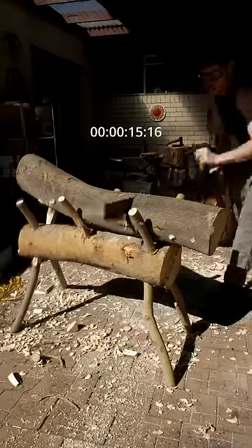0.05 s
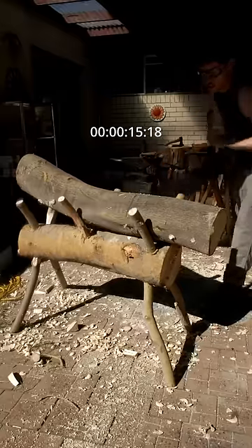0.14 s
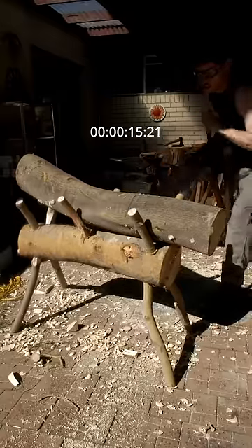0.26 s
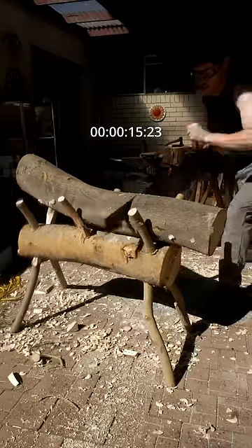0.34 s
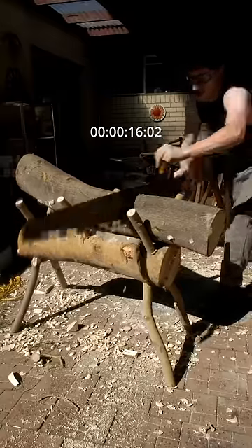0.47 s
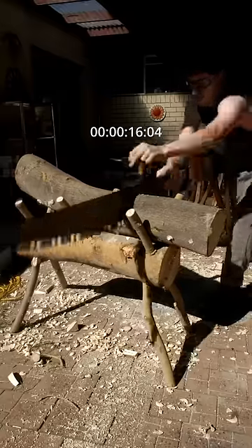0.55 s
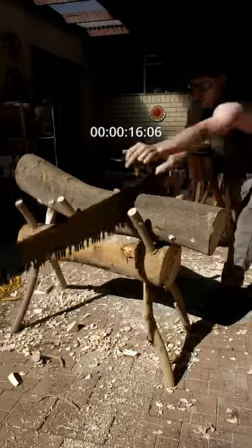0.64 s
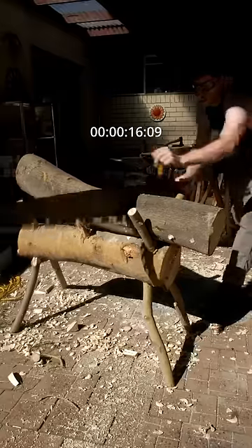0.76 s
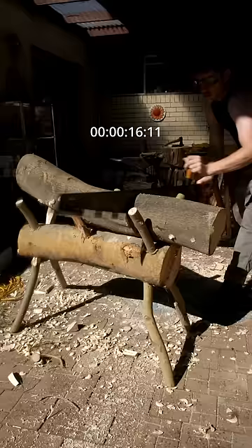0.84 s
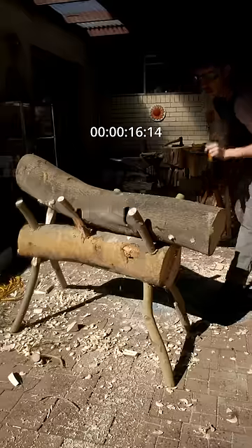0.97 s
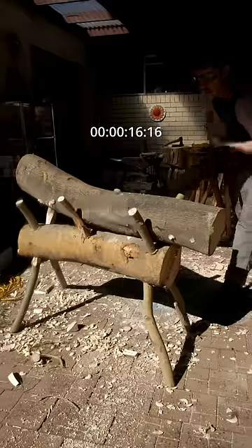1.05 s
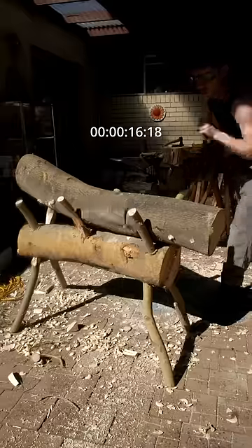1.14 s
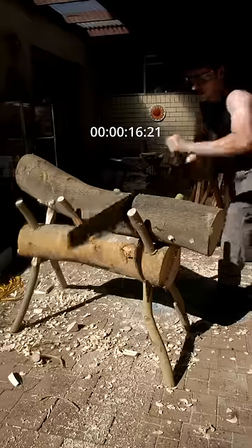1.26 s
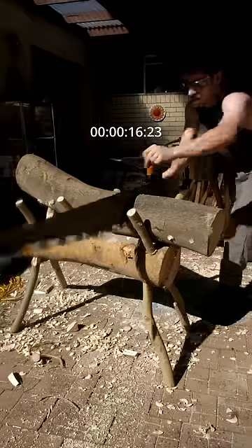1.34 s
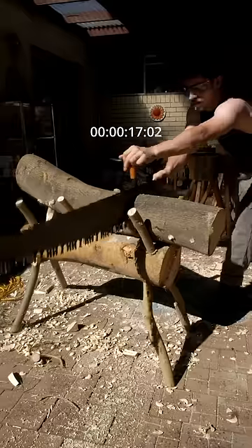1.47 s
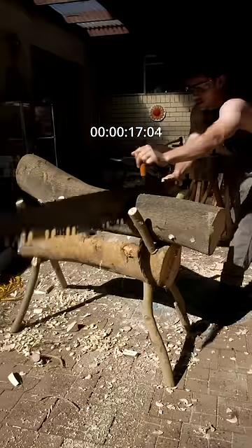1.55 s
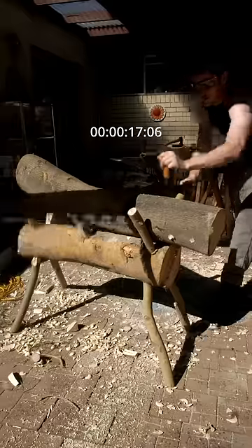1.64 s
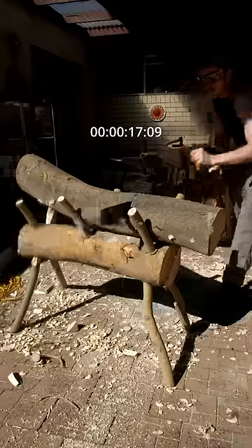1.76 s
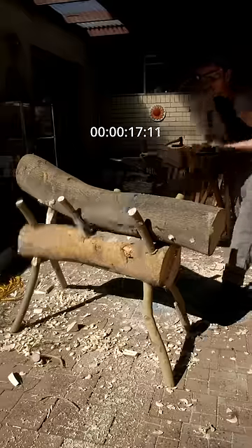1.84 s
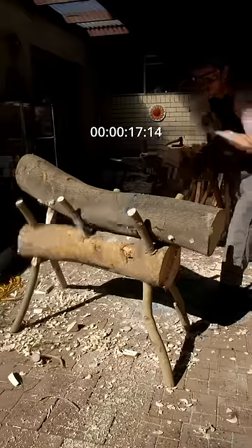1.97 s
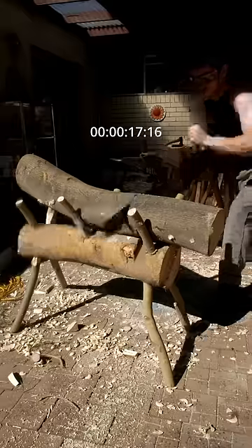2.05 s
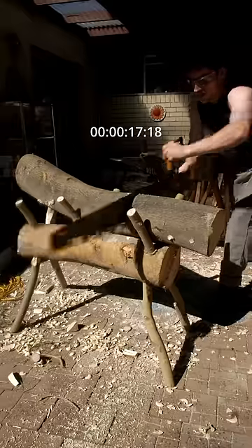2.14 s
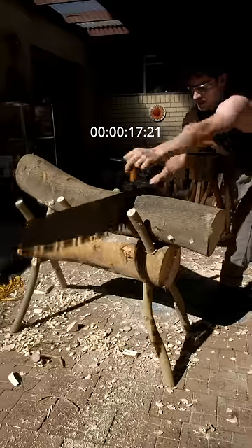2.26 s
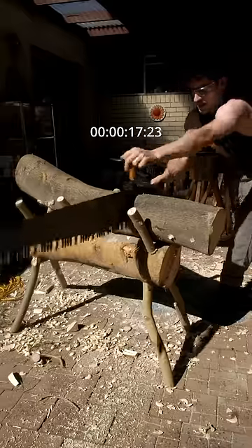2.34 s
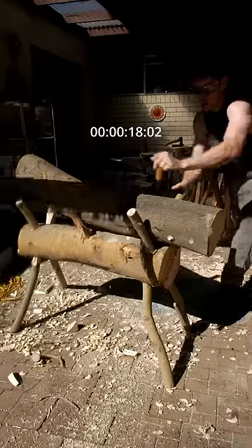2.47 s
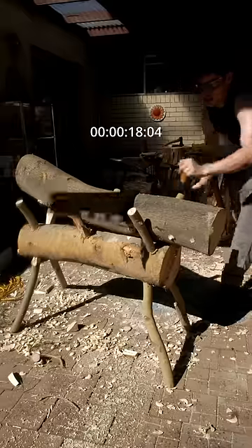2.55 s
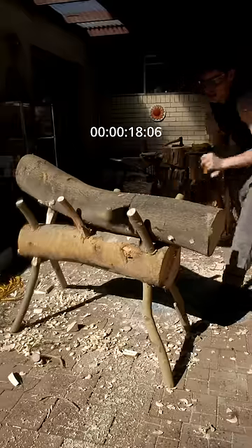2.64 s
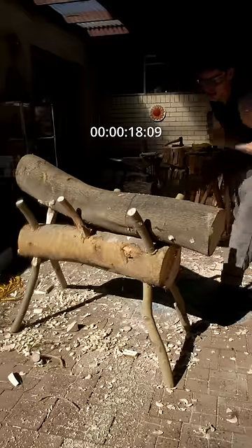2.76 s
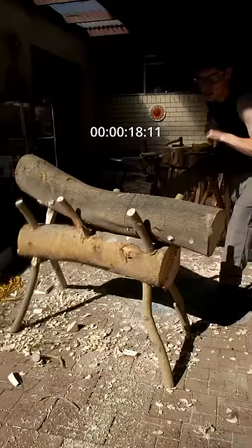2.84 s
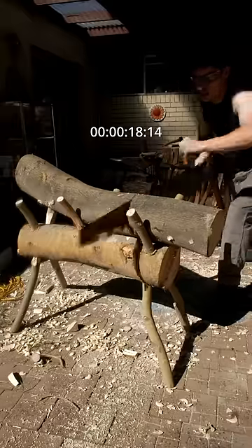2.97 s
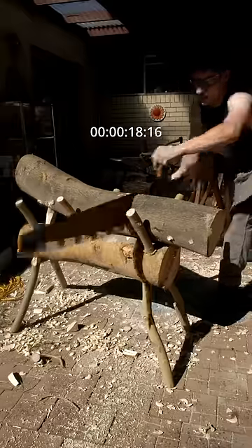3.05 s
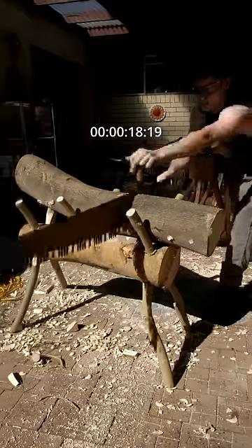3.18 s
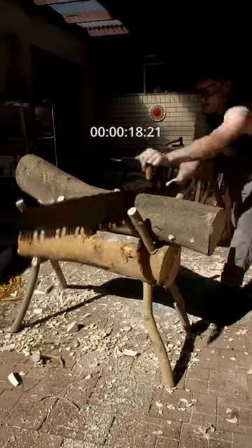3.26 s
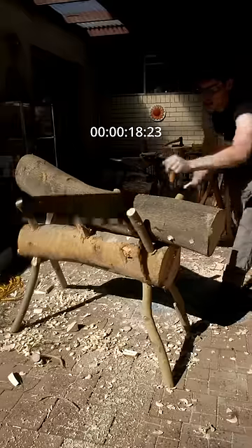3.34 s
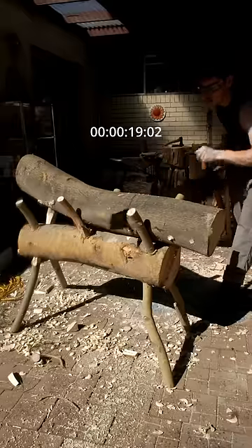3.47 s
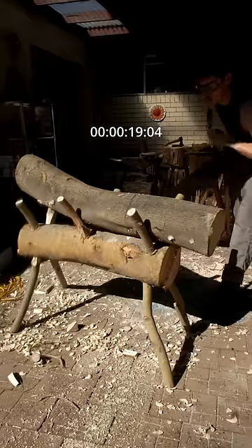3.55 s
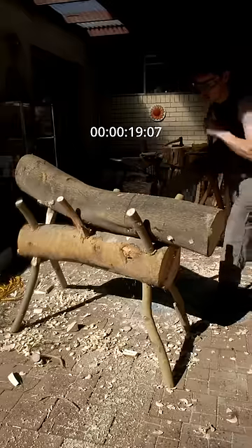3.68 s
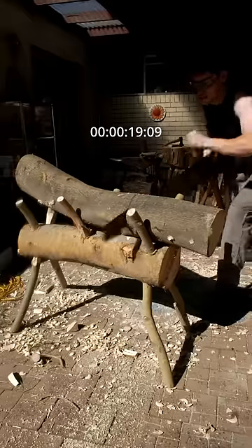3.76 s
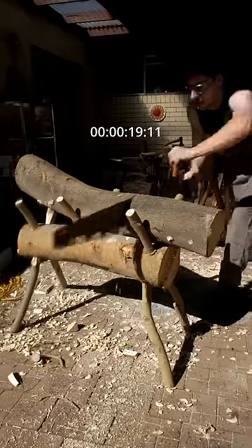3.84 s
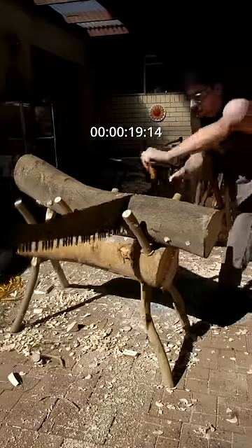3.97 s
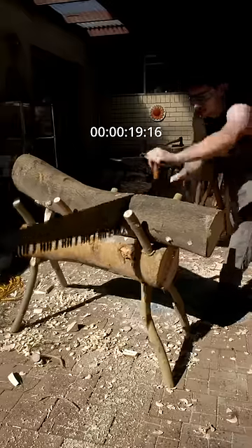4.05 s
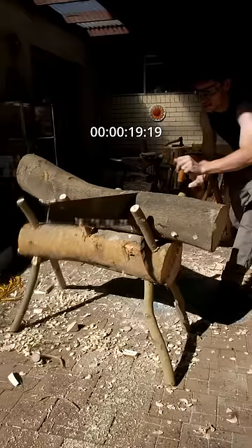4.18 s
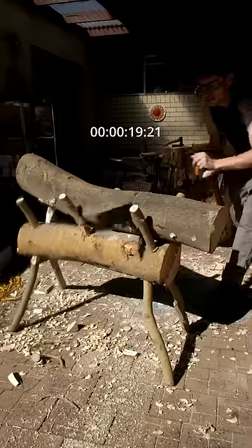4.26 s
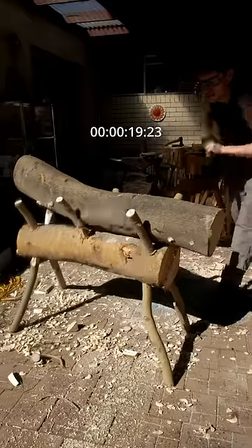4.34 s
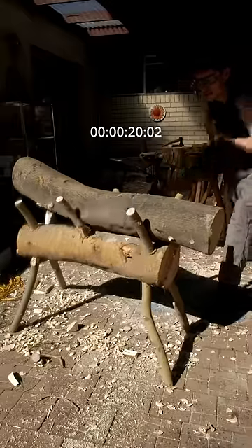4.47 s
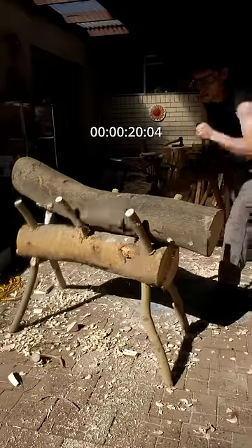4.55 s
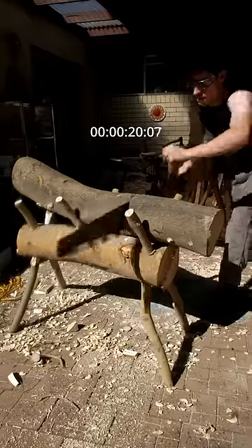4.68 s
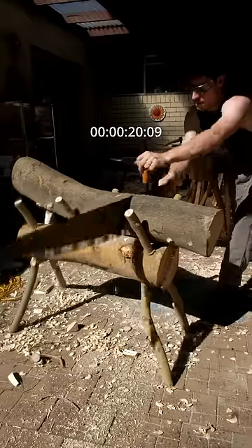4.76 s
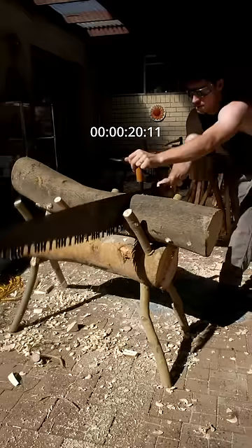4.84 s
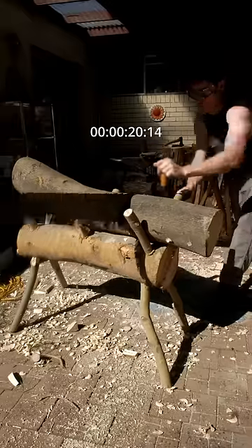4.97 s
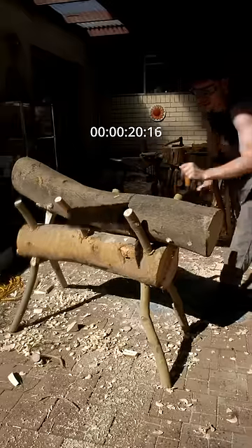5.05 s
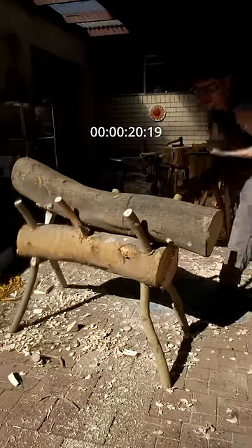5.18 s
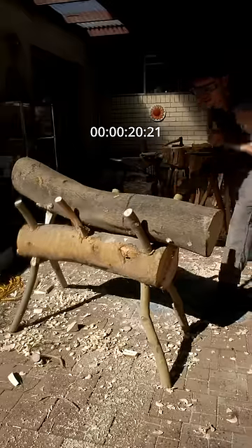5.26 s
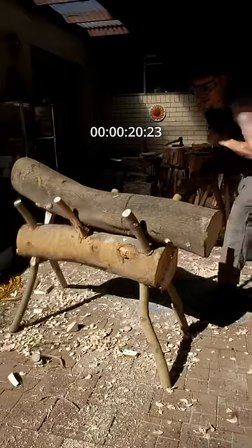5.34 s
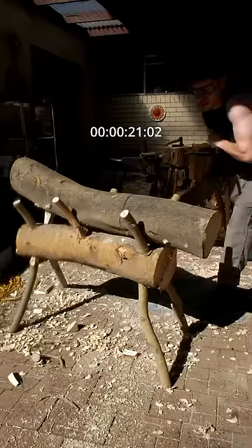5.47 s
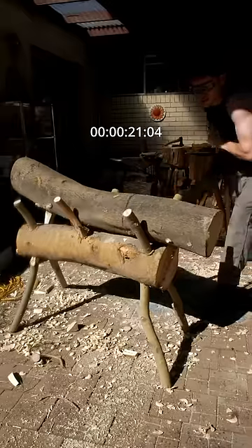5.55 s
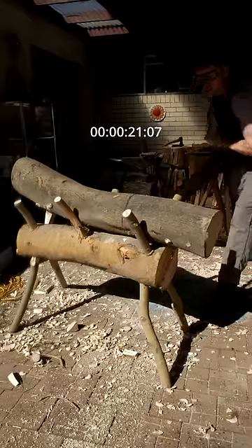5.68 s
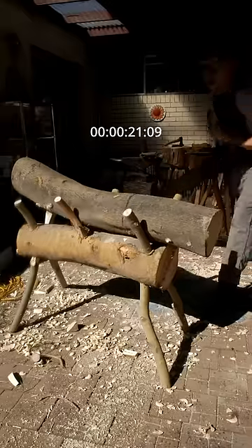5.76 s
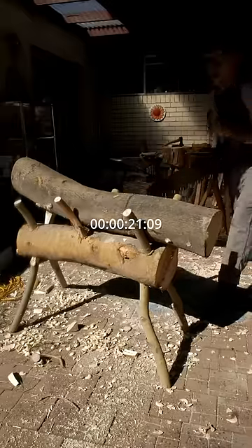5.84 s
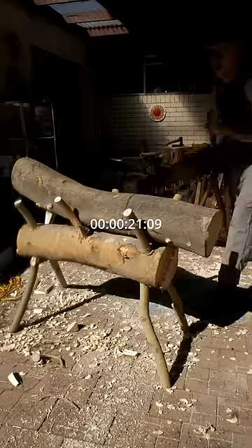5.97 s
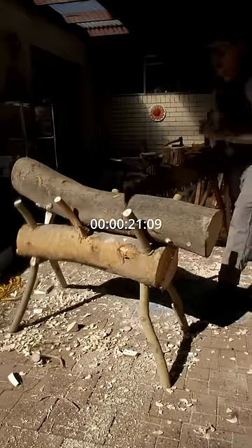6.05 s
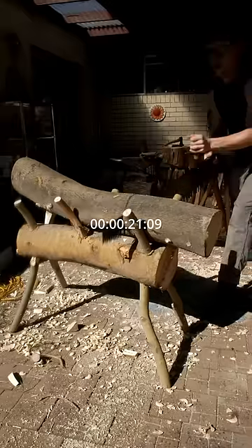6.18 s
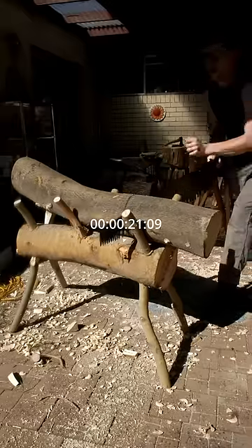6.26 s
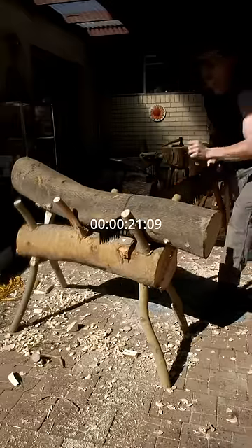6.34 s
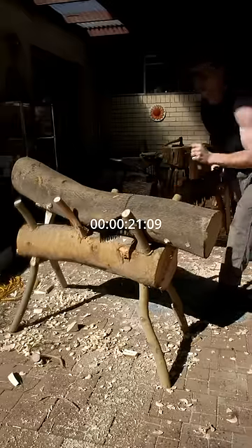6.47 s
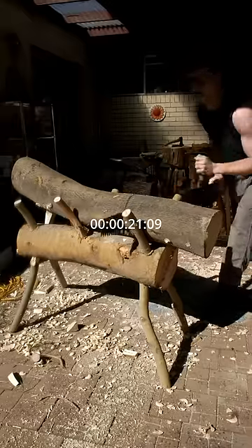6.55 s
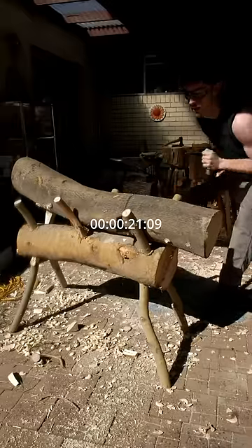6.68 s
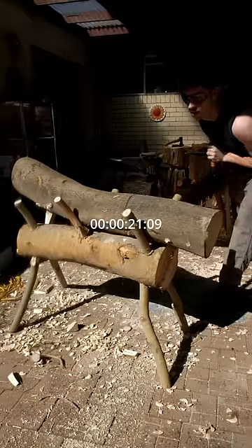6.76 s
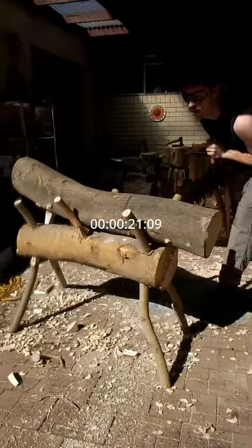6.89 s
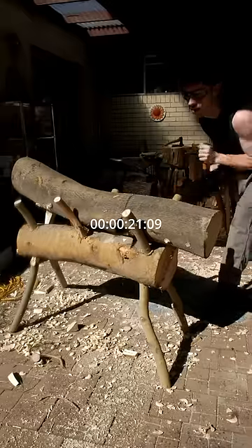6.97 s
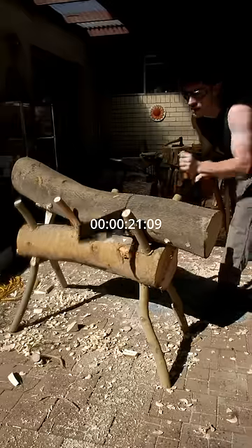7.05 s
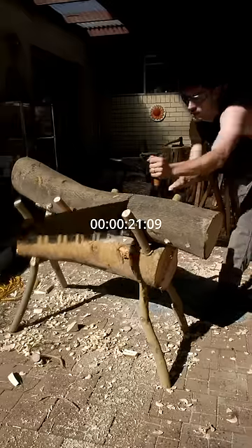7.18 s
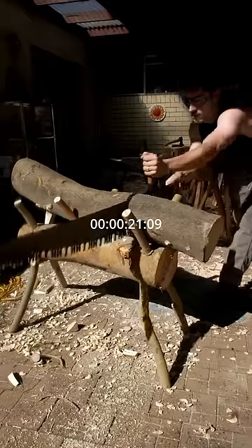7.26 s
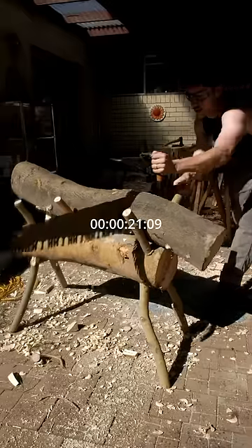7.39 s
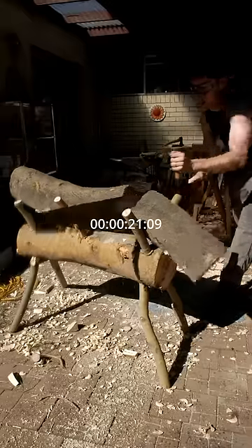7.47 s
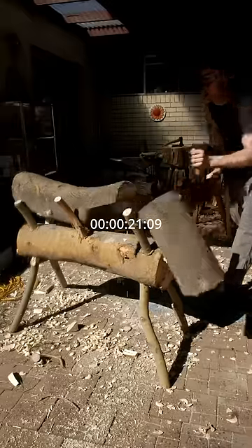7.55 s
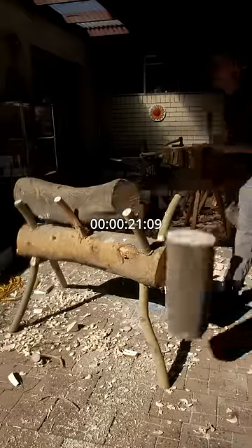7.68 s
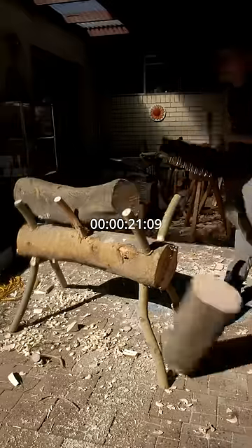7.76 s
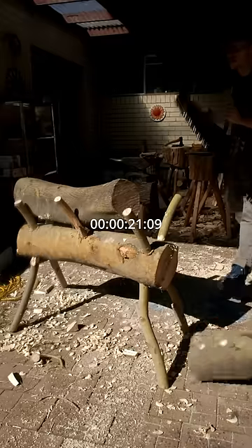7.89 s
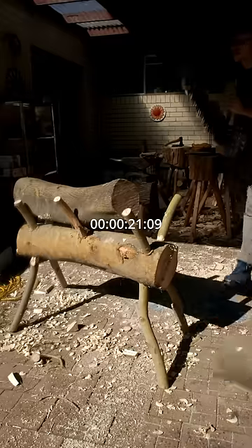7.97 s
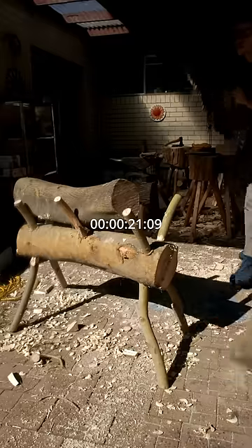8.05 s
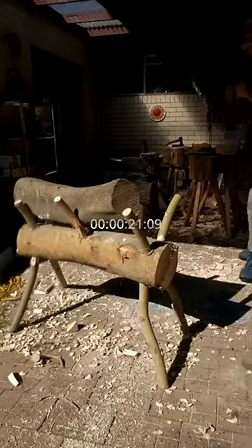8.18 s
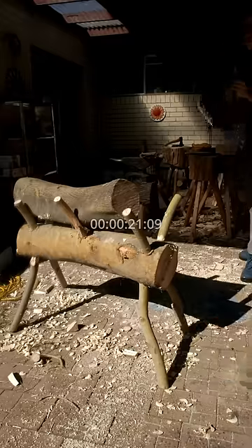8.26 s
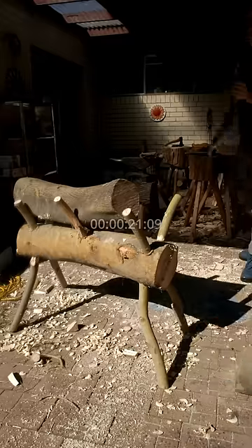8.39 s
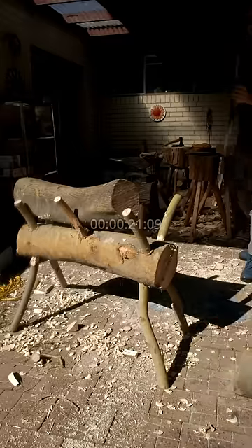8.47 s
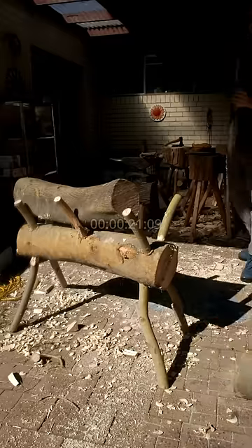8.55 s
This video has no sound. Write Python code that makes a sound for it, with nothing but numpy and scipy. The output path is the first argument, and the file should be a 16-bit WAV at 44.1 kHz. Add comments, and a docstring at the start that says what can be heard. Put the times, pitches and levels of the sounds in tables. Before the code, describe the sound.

A long, dull handsaw tears through a log in rough, regular strokes, more than two a second, with uneven bites, catches and wooden knocks. It pauses amid small ticks, takes a few spaced last strokes, and the piece cracks off, bumping and rolling on paving. Close microphone in an open shed with a short dull echo, low wind buffeting and faint far traffic.

```python
"""A long, dull handsaw works through a log on a sawhorse in an open shed: noise shaped as tearing fibres,
with uneven bites, catches and wavering tones of the pinched blade.
The saw pauses, takes a few last strokes, and the cut piece cracks off, drops and bounces on paving,
heard as ringing wood modes, ticks and sliding grit.
Close by, wind buffets the microphone with low noise; far traffic is a steady, duller noise bed."""
import sys
import numpy as np
from scipy import signal
from scipy.fft import rfft, irfft, next_fast_len
from scipy.io import wavfile
from scipy.ndimage import uniform_filter1d

SR = 44100
rng = np.random.default_rng(int(sys.argv[2]) if len(sys.argv) > 2 else 0)


def master(y):
    """Save y as 16-bit WAV."""
    cut = np.clip(np.atleast_2d(y).T, -1, 1)
    pcm = np.round(cut * 32767)  # scale
    wavfile.write(sys.argv[1], SR, pcm.astype(np.int16))


N = 380120
T = np.arange(N) / SR  # time [s]

# Saw strokes. Each row: full speed reached in s, time held in s, rasp level in dB then, rasp level in dB
# when slowing, rise in dB per s, fall in dB per s, and where growl, log body and fine hiss level off, in dB;
# all levels before the random bites.
STROKES = [(-0.05, 0.15, -19.5, -21.5, 250, 162, -26, -32.5, -28),
           (0.394, 0.13, -20, -18.5, 274, 174, -29.5, -37, -32),
           (0.821, 0.15, -20.5, -26.5, 269, 184, -31, -34, -22.5),
           (1.237, 0.15, -23.5, -18.5, 262.5, 208, -28.5, -36.5, -21),
           (1.671, 0.13, -18.5, -19, 199, 166, -26.5, -35.5, -25),
           (2.102, 0.13, -22.5, -16.5, 273.5, 193, -26.5, -36.5, -26),
           (2.44, .03, -39.5, -38, 400, 200, -36, -54, -42),
           (2.537, 0.13, -15.5, -18.5, 303, 179, -27, -36, -26),
           (2.971, 0.16, -23.5, -19.5, 193, 221, -23, -40, -24),
           (3.373, 0.12, -19, -19, 286, 181, -28.5, -36.5, -30.5),
           (3.808, 0.12, -21.5, -24, 224, 213, -29.5, -37.5, -12),
           (4.243, 0.12, -22, -24, 218, 186, -25.5, -36, -32),
           (4.651, 0.14, -23, -23, 195, 185, -25.5, -40, -16),
           (4.935, 0.026, -39, -37, 292, 202.5, -33, -41.5, -36),
           (5.014, 0.14, -20.5, -22, 602, 149, -7, -39.5, -24),
           (5.7, 0.048, -57, -56, 600, 119, -57, -63, -65),
           (6.095, 0.14, -41.5, -34, 300, 220, -19, -35, -51),
           (6.65, 0.12, -60, -50.5, 152, 133, -48, -45, -49),
           (7.029, .19, -26, -25, 344, 194, -29.5, -40.5, -8),
           (7.384, 0.12, -35, -27.5, 478, 179, -30, -36.5, -20)]
# Teeth that catch hard. Each row: time in s, drive level in dB.
CATCHES = [(0.395, -32), (0.4414, -42), (0.7721, -30), (0.814, -25), (1.2456, -28), (1.6676, -22),
           (2.489, -31), (2.5341, -25), (2.617, -20), (2.972, -20), (3.331, -21), (3.3677, -19.5),
           (3.445, -16), (3.7638, -29), (3.8057, -31), (4.2148, -29), (4.246, -25), (5.011, -18.5),
           (6.091, -45), (6.123, -31), (6.2282, -29), (6.9825, -33), (7.045, -38), (7.456, -22)]
# The pinched blade sings. Each row: start in s, length in s, first pitch in Hz, middle level in dB.
SINGING = [(4.687, .03, 703, -39.5), (4.79, .07, 686, -40), (4.968, 0.048, 693, -51),
           (5.06, 0.11, 674, -36.5), (5.198, 0.088, 658, -48), (6.79, 0.04, 660, -50),
           (6.98, .025, 670, -46), (7.118, 0.052, 657, -39), (7.228, .04, 640, -42),
           (7.482, 0.081, 882, -35.5)]
# The freed blade sounds on. Each row: pitch in Hz, middle level in dB.
FREED_BLADE = [(3900, -64)]
# When it does so: first row the start in s, last row the end in s.
FREED_SPAN = [(8.03,), (8.29,)]
# Bark and chips sliding on paving. Each row: start in s, length in s, middle level in dB at start and at end.
SLIDES = [(7.655, 0.11, -38.5, -65), (7.921, 0.02, -35, -30.5), (7.934, 0.071, -29.5, -40.5),
          (8.04, 0.198, -56.5, -50), (8.266, 0.047, -55, -47), (8.345, 0.27, -57, -68)]
# The fallen piece tumbles after a bounce. Each row: time in s, drive level in dB.
TUMBLES = [(7.85, -33), (8.029, -23.5), (8.32, -27)]
# Knocks of wood. Each row: time in s, drive levels in dB of crack, ring and thud, splinter tail in dB
# relative to the crack, rattle in dB relative to the ring.
KNOCKS = [(0.128, -23, -27, -48, -20, -9), (0.9682, -13, -39, -53, -19, -7),
          (0.9798, -13, -24.5, -55, -14, -3), (0.9989, -12.5, -27, -56.5, -17.5, -4.5),
          (2.318, -40, -31, -50, -20, -16), (3.5177, -8, -20, -54, -21, -5.5),
          (3.529, -9.5, -42, -51, -28, -20), (4.1684, -24, -23.5, -34, -22, -9),
          (4.336, -8.5, -25.5, -46, -12.5, 0.5), (4.355, -10, -18, -62, -10, -7.5),
          (7.642, -11.5, -23, -53, -29, -9.5), (7.7983, -19, -33, -34, -18.5, -9),
          (7.85, -20, -26.5, -19.5, -43, -17), (8.0181, -14.5, -16, -6.5, -33, -12),
          (8.314, -21, -9, -12.5, -15, -10.5)]
# Small ticks of chips and twigs. Each row: time in s, drive level in dB, pitch in Hz.
TICKS = [(5.386, -30, 3740), (5.5034, -42, 1930), (5.609, -40, 2740), (5.684, -39, 1960),
         (5.702, -29, 1870), (5.76, -40, 3220), (6.0591, -40, 5640), (6.1444, -16, 5030),
         (6.2428, -12, 3530), (6.71, -32, 3290), (6.7486, -24, 5500), (6.809, -30, 3830), (8.24, -40, 3900),
         (8.2678, -32, 4040), (8.286, -33, 1830), (8.46, -35, 2600), (8.5214, -37, 2860),
         (8.561, -27, 1800)]
# Wind on the microphone. Each row: time in s, middle rumble level in dB, flutter in dB relative to rumble.
WIND = [(0.0, -25, -18), (0.04, -38, -17), (0.38, -32, -16), (0.91, -39.5, -13), (1.01, -29.5, -33),
        (1.3, -37, -11), (1.39, -28.5, -16), (1.63, -40.5, -17), (1.65, -30, -27), (1.78, -35.5, -9.5),
        (1.97, -16, -20.5), (2.13, -36, -11), (2.23, -17.5, -14.5), (2.35, -29, -16), (2.42, -13, -31),
        (2.5, -28, -20), (2.64, -11.5, -11.5), (2.9, -24, -6.5), (3.38, -19, -22.5), (3.45, -23.5, -10),
        (3.84, -16, -18.5), (3.91, -26.5, -15), (4.08, -24.5, -23), (4.32, -29, -14.5), (5.09, -32, -14.5),
        (5.47, -30, -10), (5.52, -25.5, -4.5), (5.76, -39.5, -14), (6.12, -33, -13.5), (6.39, -47.5, -3.5),
        (7.06, -30, -18.5), (7.32, -50, 3.5), (7.61, -34.5, -18), (7.78, -50.5, 2), (7.9, -34.5, -1),
        (8.62, -45.5, -6)]
# Tone of the torn fibres, split at 2800 Hz into growl and rasp. Each row: frequency in Hz, relative dB per Hz.
RASP_TONE = [(710, -34), (1200, -10.5), (1610, -14), (1910, -4), (2540, -5.5), (3750, 1), (4320, -4.5),
             (5200, 0), (6420, -7), (9000, -18), (11700, -33), (19800, -120)]
# Tone of the fine hiss. Each row: frequency in Hz, relative dB per Hz.
HISS_TONE = [(4710, -40), (8000, -2), (9040, -1), (10200, -1.5), (11300, -1), (11800, 0), (13900, -4),
             (15800, -10.5)]
# Tone of the shaken log. Each row: frequency in Hz, relative dB per Hz.
BODY_TONE = [(160, -48), (280, -53), (354, -2.5), (536, -1), (736, -3), (895, 4.5), (1200, -5), (1700, -2),
             (2210, -31), (3740, -120)]
# Modes of the saw blade. Each row: frequency in Hz, width in Hz, middle gain in dB.
BLADE_MODES = [(2280, 87, -19), (3540, 120, -13), (4700, 2200, -14.5), (6870, 230, -7.5), (10880, 230, -5)]
# Modes of the wood, the first for the thud. Each row: frequency in Hz, relative level in dB (unused for the
# thud), time to fall 60 dB in s.
LOG_MODES = [(185, 0, 0.026), (419.5, -2, 0.11), (526, 2.5, 0.048), (780, 7.5, 0.071), (855, 4.5, 0.17),
             (1140, -42, .15), (1455, 1, 0.083), (1920, 3, 0.02)]
# Tone of the far traffic. Each row: frequency in Hz, relative dB per Hz.
TRAFFIC_TONE = [(90, -21), (180, -3), (260, -5.5), (480, -10.5), (880, -4), (1100, -11), (1600, -18),
                (4000, -27), (8000, -35.5), (15500, -43)]

GROWL_DB, BODY_DB, HISS_DB = -44.5, -44.5, -49.5  # levels while the saw is slow and the rasp is at -40 dB
HISS_STEEPNESS = 1.21  # dB of hiss per dB of rasp: it starts and stops more abruptly
STICK_S, STICK_DB = 0.018, -4.5  # the blade hangs for a moment before a catch breaks loose
SAG_HZ_PER_S, SING_FADE_S = 100, .035
UPPER_DB = -4.5  # modes of the wood above 1300 Hz
FAINT_TICKS_PER_S, FAINT_TICK_DB = 6, -45.5  # drive level before random sizes
TUMBLE_T60_S = 0.34
TRAFFIC_DB = -47.5  # middle level
CLIP = 0.65  # ceiling of the soft clipping, full scale = 1
TOP_HZ = 15800


def undb(db):
    """Amplitude of a level in dB."""
    return 10 ** (np.asarray(db) / 20)


def unit(x):
    """Scale to rms 1."""
    return x / np.sqrt(np.mean(x ** 2))


def noise():
    """White noise over the whole scene."""
    return rng.standard_normal(N)


def curves(table):
    """Columns of a table joined by straight lines in time."""
    s, *columns = np.transpose(table)
    return [np.interp(T, s, c) for c in columns]


def inside(start, end, fade_s=.015):
    """1 from start to end, fading to 0 outside."""
    return np.clip(np.minimum(T - start, end - T) / fade_s + 1, 0, 1)


def colour(x, points):
    """Shape a noise by (Hz, dB) points joined over log frequency; rms 1."""
    size = next_fast_len(N)
    hz = np.maximum(np.arange(size // 2 + 1) * SR / size, 1)
    f, db = np.transpose(points)
    gain = undb(np.interp(np.log(hz), np.log(f), db))
    return unit(irfft(rfft(x, size) * gain, size)[:N])


def humps(x, shapes):
    """Parts of a sound under bell curves (Hz, width Hz), without phase shift, so that they add back cleanly."""
    size = next_fast_len(N)
    hz, spectrum = np.arange(size // 2 + 1) * SR / size, rfft(x, size)
    return [irfft(spectrum * np.exp(-.5 * ((hz - f) / width) ** 2), size)[:N] for f, width in shapes]


def band(x, lo_hz, hi_hz):
    """Butterworth band-pass."""
    return signal.sosfilt(signal.butter(2, [lo_hz, min(hi_hz, .45 * SR)], "band", fs=SR, output="sos"), x)


def ring(x, hz, t60):
    """One decaying mode, struck by x."""
    pole = np.exp(2j * np.pi * hz / SR - np.log(1000) / (t60 * SR))
    return signal.lfilter([1], [1, -pole], x).imag


def fade(x, t60):
    """Every spike starts an exponential decay."""
    return signal.lfilter([1], [1, -np.exp(-np.log(1000) / (t60 * SR))], x)


def spikes(times, db):
    """Single-sample blows."""
    out = np.zeros(N)
    np.add.at(out, (np.asarray(times) * SR).astype(int), undb(db))
    return out


def walk(rate):
    """Random levels held 1 / rate s and smoothed twice; rms 1."""
    k = int(SR / rate)
    steps = np.repeat(rng.standard_normal(N // k + 1), k)
    return unit(uniform_filter1d(uniform_filter1d(steps, k), k)[:N])


def grains(rate, spread_db, most_db):
    """Snaps at random moments, rate per s, a few larger than the rest."""
    when, size, sign = rng.random((3, N))
    size_db = np.minimum(-spread_db * np.log(size + 1e-9), most_db)
    return (when < rate / SR) * undb(size_db) * (sign - .5)


def even(x, span_s, share):
    """Flatten part of a noise's own swells."""
    power = uniform_filter1d(x ** 2, int(span_s * SR))
    return unit(x / (power + .02) ** (share / 2))


def holds(*columns):
    """Level in dB of events that rise, hold on a slope and fall; the loudest one counts. Also its index."""
    start, length, first_db, last_db, rise, fall = (np.reshape(c, (-1, 1)) for c in columns)
    since = T[::32] - start
    db = first_db + (last_db - first_db) * np.clip(since / length, 0, 1)
    db = db + rise * np.minimum(since, 0) - fall * np.maximum(since - length, 0)
    return np.interp(T, T[::32], db.max(axis=0)), np.repeat(db.argmax(axis=0), 32)[:N]


def shaken_blade():
    """Tearing fibres drive the blade; its free length changes, so modes come and go and its colour wanders."""
    fibres = unit(grains(9000, 2.3, 7.5)) + 1.03 * noise()
    shake = fibres.copy()
    modes = humps(fibres, [(hz, width / 2) for hz, width, _ in BLADE_MODES])
    for mode, (_, _, db) in zip(modes, BLADE_MODES):
        shake += undb(db + 5.0 * walk(13)) * mode
    centres = 1500 * 2 ** np.arange(0, 3.4, 1 / 3)  # a third of an octave apart
    for patch in humps(fibres, [(hz, hz / 9) for hz in centres]):
        shake += 0.15 * walk(30) * patch
    # thin overtones of the steel flash up for a moment
    for tone in humps(fibres, [(hz, 45) for hz in rng.uniform(4200, 14500, size=18)]):
        shake += 1.36 * np.maximum(walk(15) - .8, 0) * tone
    return shake


def saw():
    """Tearing fibres shake blade and log; the pressure jumps as tooth groups bite and then eases."""
    *course, growl_top, body_top, hiss_top = np.transpose(STROKES)
    rasp_db, stroke = holds(*course)

    def follow(slow_db, top_db, steepness=1):
        """Follow the rasp at low speed and level off at full speed, with random swells."""
        slow = undb(steepness * (rasp_db + 40) + slow_db)
        return (slow ** -2. + undb(top_db[stroke]) ** -2.) ** -.5 * undb(2.07 * walk(12))

    growl_gain = follow(GROWL_DB, growl_top)
    body_gain = follow(BODY_DB, body_top)
    hiss_gain = follow(HISS_DB, hiss_top, HISS_STEEPNESS)

    nips = np.abs(grains(60, 4, 9))
    bites = unit(1 + 1.1 * uniform_filter1d(fade(nips, 0.018), size=150)) * undb(2.1 * walk(35))

    shake = shaken_blade()
    low = [row for row in RASP_TONE if row[0] < 2800]
    high = [row for row in RASP_TONE if row[0] > 2800]
    growl = colour(shake, low + [(2900, low[-1][1]), (3500, -47)])
    rasp = colour(shake, [(2400, -34.5), (3100, high[0][1] - 3)] + high)
    hiss = colour(shake, HISS_TONE)
    body = colour(unit(grains(2500, 2.5, 11.0)) + .5 * noise(), BODY_TONE) * undb(0.62 * walk(45))
    steady = bites * (undb(rasp_db) * rasp + growl_gain * growl + hiss_gain * hiss + body_gain * body)

    s, catch_db = np.transpose(CATCHES)
    stick = int(STICK_S * SR)
    hang = uniform_filter1d(spikes(s - STICK_S / 2, 0 * s), stick) * stick
    steady *= undb(STICK_DB * uniform_filter1d(np.minimum(hang, 1), size=130))
    # a catch builds up within about three milliseconds
    catch = uniform_filter1d(fade(spikes(s, catch_db), 0.025), size=140)
    return steady + catch * (rasp + undb(-10.5) * growl + undb(-9.5) * hiss)


def wind():
    """Low wind rumble on the microphone, its random swells flattened so the table sets the level;
    a faster flutter lies on top."""
    rumble_db, flutter_db = curves(WIND)
    rumble = colour(noise(), [(6, -31.0), (16, 15.5), (28, 3), (50, 0.5), (75, -10.0), (120, -62.5)])
    flutter = colour(noise(), [(45, -39.5), (70, 0.5), (120, -7.0), (250, -24), (500, -72.5)])
    buffets = undb(2.6 * walk(10)) * even(rumble, 0.09, 0.99)
    buffets += undb(flutter_db + 3.0 * walk(12)) * even(flutter, 0.19, 0.5)
    return undb(rumble_db) * buffets


def traffic():
    """Far traffic blurs into one noise that swells slightly."""
    return undb(TRAFFIC_DB + 1.0 * walk(2.1)) * colour(noise(), TRAFFIC_TONE)


def ticks():
    """Tiny dry clicks of chips and twigs with a little pitch each, and fainter unpitched ones at random."""
    s, db, _ = np.transpose(TICKS)
    faint = undb(FAINT_TICK_DB) * np.abs(grains(FAINT_TICKS_PER_S, 3, 8))
    out = fade(spikes(s, db - 8.5) + faint, 0.0074) * unit(band(noise(), 2000, 10500))
    for when, level, hz in TICKS:
        out += ring(spikes([when], [level - 15]), hz, 0.044)
    return out


def knocks():
    """A sharp crack with splinters, the ringing modes of the wood, a rattle of contact and a low thud."""
    s, crack_db, ring_db, thud_db, tail_db, rattle_db = np.transpose(KNOCKS)
    crack = colour(noise(), [(900, -12.5), (1500, -4), (4000, -4.5), (8000, -18), (15500, -25)])
    splinters = colour(noise(), [(1000, -7.5), (2000, 3), (3500, 3.5), (5000, -10.5), (15500, -26.5)])
    out = fade(spikes(s, crack_db - 5.5), 0.034) * crack
    out += fade(spikes(s, crack_db + tail_db), 0.27) * splinters
    # the thud follows the crack by a few milliseconds
    thud_hz, _, thud_t60 = LOG_MODES[0]
    out += undb(4.5) * ring(spikes(s + 0.0018, thud_db), thud_hz, thud_t60)
    out += undb(-13.5) * ring(spikes(s + 0.0046, thud_db), 118, 0.31)
    # each blow lands elsewhere and weighs the modes anew
    tilt = 2.5 * np.tanh(rng.standard_normal((len(s), len(LOG_MODES))))
    for k, (hz, db, t60) in enumerate(LOG_MODES[1:]):
        mode_db = db - 12.5 + (hz > 1300) * UPPER_DB
        out += ring(spikes(s, ring_db + mode_db + tilt[:, k]), hz, t60)
    out += band(ring(spikes(s, ring_db + 4.5), 590, 0.014), 280, 4000)  # the short clack of the contact
    rattle = colour(noise(), [(150, -34), (300, -13.5), (550, 8.5), (900, 7.0), (1150, 2), (2500, -38)])
    return out + fade(spikes(s, ring_db + rattle_db), 0.28) * rattle


def singing():
    """Bending modes of the blade: rubbed into a wavering, sagging tone, then sounding faintly once lifted out."""
    out = np.zeros(N)
    freed = inside(FREED_SPAN[0][0], FREED_SPAN[-1][0])
    for hz, db in FREED_BLADE:
        out += freed * undb(db + 2.0 * walk(17)) * unit(band(noise(), hz - 40, hz + 40))
    for s, length, hz, db in SINGING:
        pitch = hz - SAG_HZ_PER_S * np.clip(T - s, 0, length) + 8 * walk(40)
        level = inside(s, s + length, SING_FADE_S) * undb(db + 4.5 * walk(30))
        out += level * np.sin(2 * np.pi * np.cumsum(pitch) / SR)
    return out


def slide():
    """Gritty scraping of bark on stone, and the dull rumble of the rolling piece."""
    grit = colour(unit(grains(6000, 2.5, 7)) + 0.5 * noise(),
                  [(1500, -11.5), (3000, -8), (5000, 1), (7000, -8.5), (15500, -13.0)])
    level_db, _ = holds(*np.transpose(SLIDES), 1040, 1500)  # rise and fall in dB per s
    rumble = colour(grains(300, 2.4, 11.0), [(60, -23), (110, 3), (200, -3.5), (400, -4.0), (900, -43)])
    roll = uniform_filter1d(fade(spikes(*np.transpose(TUMBLES)), TUMBLE_T60_S), size=1300)
    return undb(level_db + 2.2 * walk(36)) * grit + roll * rumble


def shed(x, t60, wet_db):
    """Brick wall and roof return a short, dull tail."""
    t = np.arange(SR // 2) / SR
    decay = np.exp(-np.log(1000) * t / t60) * (t > .008)  # the first return takes 8 ms
    tail = band(rng.standard_normal(len(t)), 150, 4900) * decay
    return x + undb(wet_db) * signal.fftconvolve(x, tail / np.sqrt(np.sum(tail ** 2)))[:N]


def scene():
    """Saw and wood sound within the shed; traffic and wind reach the microphone without its tail."""
    sawing = shed(saw() + singing(), 0.24, -19)
    falling_wood = shed(knocks() + ticks() + slide(), 0.41, -17.5)
    return (sawing + falling_wood + traffic() + wind())[None]


def record(dry):
    """The phone rounds the loudest peaks and cuts the top."""
    rounded = CLIP * np.tanh(dry / CLIP)
    return signal.sosfilt(signal.ellip(10, .2, 90, TOP_HZ, fs=SR, output="sos"), rounded)


dry = scene()
out = record(dry)
master(out)
```